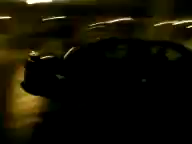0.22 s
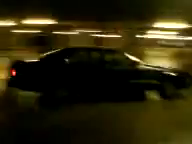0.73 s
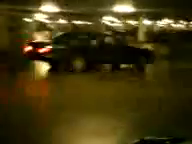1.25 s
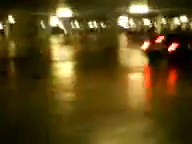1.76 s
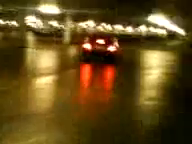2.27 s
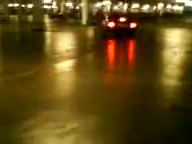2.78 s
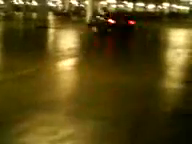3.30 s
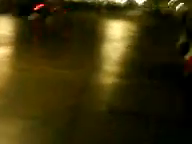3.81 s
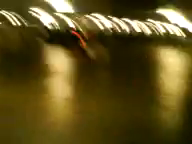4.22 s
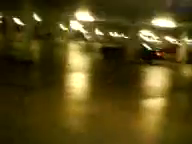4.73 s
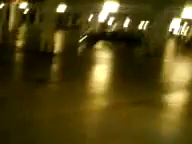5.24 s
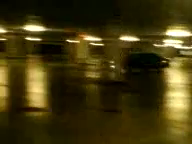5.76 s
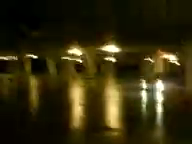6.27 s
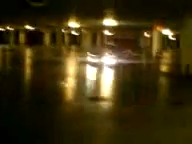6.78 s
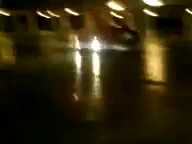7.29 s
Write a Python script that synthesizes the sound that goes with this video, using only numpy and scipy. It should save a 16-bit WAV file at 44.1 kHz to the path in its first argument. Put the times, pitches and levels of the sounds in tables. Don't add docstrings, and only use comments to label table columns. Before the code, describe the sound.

Rough engine roar and piercing tyre chirps on slick concrete fade into the distance, then a rising engine and ragged squeals return, ending loud.

```python
import sys
import numpy as np
from scipy import signal
from scipy.fft import rfft, irfft, next_fast_len
from scipy.io import wavfile
from scipy.ndimage import uniform_filter1d

SR = 44100
rng = np.random.default_rng(int(sys.argv[2]) if len(sys.argv) > 2 else 0)


def ratio_of_db(decibels):
    return 10 ** (np.asarray(decibels, float) / 20)


def inscribe(sig):
    pcm = np.round(np.clip(np.atleast_2d(sig).T, -1, 1) * 32767)
    wavfile.write(sys.argv[1], SR, pcm.astype(np.int16))


N = 334719
T = np.arange(N) / SR

# t/s, firing rate f/Hz
ENGINE_SPEED = [
    [(0, 116), (.14, 120), (.4, 124.8), (.66, 124.4), (.74, 114), (.82, 110), (.9, 90.2), (1.04, 83.6)],
    [(1.06, 134), (1.13, 129.5), (1.24, 131), (1.45, 110), (1.75, 103.5)],
    [(1.8, 102.7), (2.1, 101.5), (2.35, 103.5), (2.72, 91.5), (3.05, 94.6), (3.65, 89.8), (4.0, 91.6),
     (4.2, 95)],
    [(4.22, 66.5), (4.36, 85), (4.45, 94.5), (4.7, 102.7), (4.9, 118), (5.28, 134.5), (5.72, 169),
     (6.3, 194.5), (6.5, 197.5)],
    [(6.55, 199), (7.0, 209), (7.3, 224), (7.45, 219.5), (7.59, 219)],
]
# speed jitter (0-1), level scatter/dB
ENGINE_UNREST = [
    (.016, 5.),
    (.015, 5.),
    (.004, 2.5),
    (.005, 3.),
    (.012, 6.),
]
# t/s, level/dB, throttle bite in dB per octave of order
ENGINE_LOAD = [(.15, -21, 2), (.5, -17, 1.5), (.7, -19.5, 4.5), (.93, -20, -6), (1.17, -32.5, -10),
               (1.3, -37.5, -12), (1.65, -61.5, 2.5), (1.95, -42.5, -11.5), (2.8, -41.5, -5),
               (3.3, -48, -2), (4.19, -42.5, -7), (4.32, -30.5, 9.5), (4.7, -30, -2.5), (5.25, -27.5, 4),
               (5.8, -26, -5), (6.45, -30, 3.5), (6.65, -45, 3.5), (7.3, -25.5, -9.5)]
# level/dB over the effort, for firing orders 1, 1.5, 2, 3 and 1.25
ENGINE_ORDERS = [
    (-7.5, -14.5, -6.5, -4.5, -22),
    (-4, -8.5, -11.5, -8.5, -7),
    (-1, 2.5, -4.5, -16.5, -2.5),
    (2.5, -8, -5, -16, -24.5),
    (-1.5, 0, -4, -12.5, -16.5),
]
# f/Hz, width/Hz, level/dB
EXHAUST_RINGS = [(97, 4, 3.5), (108.4, 1.8, 5), (123.5, 5.8, -12), (131.8, 9.9, 8.5), (147, 4, -6),
                 (166, 5.1, 3), (184, 11, -11.5), (204, 3, 1.5), (226, 3.7, -0.5), (278, 21, 9),
                 (336, 12, -5), (362, 12, 2.5), (404.4, 15, -8.5), (503, 16, 0)]
# t/s, main tread tone f/Hz, level/dB, level of the other tones relative to it/dB
SLIDE_SQUEAL = [(.45, 1320, -22.5, 1.5), (.6, 1309, -12.5, -10), (.8, 1347, -19.5, 0),
                (.95, 1330, -7, -15.5), (1.07, 1310, -11, -4), (1.2, 1265, -29, 0),
                (1.29, 1202, -21.5, -1.5), (1.4, 1353, -28, -5), (1.6, 1400, -60.5, 22)]
TURN_SQUEAL = [(1.63, 1436, -55, -1), (1.665, 1497, -41.5, -2.5), (1.706, 1440, -26.5, -1.5),
               (1.76, 1378, -31, 1.5), (1.94, 1277, -29.5, -12.5), (2.09, 1347, -41.5, -1.5),
               (2.24, 1337, -31, -3), (2.3, 1398, -48.5, -1), (2.42, 1618, -47, 2.5)]
BRAKE_SQUEAL = [(3.71, 2090, -61.5, 0), (3.74, 2033, -17.5, 0), (3.79, 2065, -26, 0), (3.81, 2066, -37, 0),
                (3.95, 2120, -34, 0), (4.08, 2090, -40, 0), (4.25, 2000, -60, 0)]
SPIN_SQUEAL = [(5.5, 1431, -50.5, 14), (5.9, 1428, -35.5, 2.5), (6.05, 1405, -24, 4.5),
               (6.28, 1390, -18.5, -0.5), (6.55, 1365, -14, 1), (6.85, 1441, -15.5, 2.5),
               (7.15, 1503, -5, -9), (7.4, 1500, -7, 2), (7.59, 1458, -15, -2.5)]
CREEP_SQUEAL = [(4.02, 3373, -49, -22), (4.25, 3350, -60, -29), (4.6, 3420, -48.5, -20),
                (4.95, 3350, -58, 1), (5.1, 3350, -51, 15), (5.3, 3350, -54, 1)]
# ratio to it, level/dB; the creep's sit below it
SLIDE_UPPER = [(1.938, 0.)]
TURN_UPPER = [(2.13, -2.5), (1.99, -17)]
CREEP_LOWER = [(0.412, 0.003), (0.482, 0.)]
# start f/Hz, drift in Hz per s, level/dB
SPIN_UPPER = [(1868, -80, -1), (2334, 110.5, -6)]
# t/s, peak level/dB, f/Hz, length/s
SLIDE_SLIPS = [(.2556, -5.5, 1232, 0.037), (.864, 5.5, 1322, 0.025), (.9267, 4.5, 1224, 0.024),
               (.9548, 5, 1343, 0.046), (1.0601, -1.5, 1225, 0.037), (1.2391, -6.5, 1210, 0.011),
               (1.283, 3.5, 2432, 0.014), (1.284, -5.5, 1254, 0.023), (1.3804, -5.5, 1447, 0.01),
               (1.632, -32, 1460, 0.038), (1.674, -14, 3140, 0.029), (1.699, -8.5, 3050, .02),
               (3.737, -19.5, 2040, .01), (3.7737, -10.5, 2090, 0.0077)]
SCUFF_SLIPS = [(2.69, -37, 3210, 0.039), (2.708, -24.5, 3180, .04), (2.7206, -6.5, 2920, 0.0059),
               (2.7336, -14.5, 2410, 0.035), (2.768, -11.5, 1916, 0.021), (2.79, -44.5, 3380, 0.033),
               (4.292, -25.5, 2500, 0.01), (4.366, -30.5, 2110, 0.051)]
SPIN_SLIPS = [(5.033, -25, 1643, 0.029), (5.5777, -15, 1814, 0.028), (5.7094, -7, 2560, 0.009),
              (5.78, -12, 1914, 0.018), (5.8058, -1.5, 1852, .029), (5.888, -4, 2296, .02),
              (5.889, -12.5, 1363, .02), (5.9569, -6, 1854, 0.031), (5.979, -0.5, 1810, .025),
              (5.99, -3, 1613, 0.018), (6.0318, -6, 1814, 0.0098), (6.052, 1.5, 2115, .013),
              (6.0911, -6.5, 1950, 0.015), (6.1154, -1, 1877, 0.026), (6.1636, -5.5, 1420, 0.032),
              (6.211, -21, 1384, .011), (6.251, -8, 1880, 0.013)]
# t/s, peak level/dB
GRIT_SNAPS = [(2.314, -31), (2.723, -15), (2.731, -7), (2.773, -11.5), (2.783, -7.5), (2.789, -14),
              (3.465, -35), (3.651, -29), (3.817, -4), (4.093, -25), (4.203, -29)]
# low f/Hz, high f/Hz, flicker/dB
ROAR_EDGES = [
    (75, 420, 1.),
    (420, 1100, 1.5),
    (1180, 2100, 1.8),
    (2100, 3700, 2.8),
]
# engine level/dB, its steepness, tyre level/dB, its steepness, jolt level/dB
ROAR_SOURCES = [
    (-2.5, 1.35, -12, 0.8, 8.5),
    (-2, 2, -10.5, 0.82, 0),
    (-8, 2.3, 0, 1., -24),
    (-5, 2.18, -2.5, 1, -2),
]
# t/s, level/dB
TYRE_SCRUB = [(0, -16), (.6, -17.5), (.8, -20), (1.06, -25.5), (1.46, -47), (1.61, -46.5), (1.9, -42),
              (2.2, -48.5), (2.45, -56.5), (3.4, -56), (4.45, -60), (4.9, -43.5), (5.85, -31.5),
              (6.15, -22), (6.7, -13.5), (7.1, -13), (7.3, -9), (7.59, -20.5)]
# t/s, half length/s, level/dB
CAR_JOLTS = [(2.763, 0.055, -43.5), (3.64, 0.072, -54), (3.821, 0.0064, -41), (4.28, 0.043, -43)]
# f/Hz, width/Hz, level/dB
TREAD_RINGS = [(1365, 55, -1.5), (2324, 273, 6.5), (3350, 140, -2.5)]
# f/Hz, level/dB
PHONE_BAND = [(30, -13), (70, -1.5), (110, 0.5), (3000, -3), (3400, -4.5), (3700, -14), (4000, -17),
              (4300, -27.5), (4600, -90)]


def walk(rate):
    k = int(SR / rate)
    steps = np.repeat(rng.standard_normal(N // 50), k)[:N]
    return 1.3 * uniform_filter1d(uniform_filter1d(steps, k), k)


def held(rate):
    steps = np.cumsum(rate / SR * ratio_of_db(4 * walk(rate / 2))) + rng.random()
    values = rng.standard_normal(N // 50)
    return values[np.minimum(steps.astype(int), N // 50 - 1)], steps % 1


def play(table):
    s, *columns = np.transpose(table)
    gate = np.clip(np.minimum(T - s[0] + .01, s[-1] + .01 - T) / .02, 0, 1)
    return gate, [np.interp(T, s, c) for c in columns]


def tone(hz):
    return 2 * np.pi * (np.cumsum(hz) / SR + rng.random())


def band(low_hz, high_hz):
    sos = signal.butter(2, [low_hz, high_hz], "band", fs=SR, output="sos")
    x = signal.sosfilt(sos, rng.standard_normal(N))
    return x / x.std()


def engine():
    _, (hz,) = play(np.concatenate(ENGINE_SPEED))
    _, (load_db, bite_db) = play(ENGINE_LOAD)
    stage = np.searchsorted([table[0][0] for table in ENGINE_SPEED[1:]], T)
    first_db, half_db, second_db, third_db, quarter_db = np.transpose(ENGINE_ORDERS)[:, stage]
    jitter, scatter_db = np.transpose(ENGINE_UNREST)[:, stage]
    pipe_hz = np.arange(1200)
    ring_db = sum(db / (1 + ((pipe_hz - f) / w) ** 2) for f, w, db in EXHAUST_RINGS)
    phase = tone(hz * (1 + jitter * walk(30)))
    whole = {4: first_db, 8: second_db, 12: third_db, 16: third_db - 12, 20: third_db - 24}
    out = np.zeros(N)
    for quarter in range(2, 21):
        order = quarter / 4
        if quarter in whole:
            order_db = whole[quarter]
        else:
            octaves = np.log2(quarter / (6 - quarter % 2))
            fall_db = -11 * octaves ** 1.2 if octaves > 0 else 8.5 * octaves
            order_db = fall_db + (quarter_db if quarter % 2 else half_db)
        if quarter == 2:
            order_db = order_db + 12 * np.exp(-((hz / 2 - 87) / 6) ** 2)
        pipe_db = np.interp(hz * order, pipe_hz, ring_db)
        throttle_db = np.log2(max(order, 1)) * bite_db
        unrest_db = scatter_db * walk(32) + 2 * walk(9)
        db = load_db + throttle_db + pipe_db + order_db + unrest_db
        out += np.sqrt(2) * ratio_of_db(db) * np.sin(order * phase + quarter ** 2)
    return out, np.cos(phase)


def tread_tones(table, ratios=(), drifts=()):
    gate, (hz, db, upper_db) = play(table)
    tones = [(hz, db)]
    for ratio, tone_db in ratios:
        tones.append((ratio * hz, db + upper_db + tone_db))
    for start_hz, drift, tone_db in drifts:
        tones.append((start_hz + drift * (T - table[0][0]), db + upper_db + tone_db))
    return gate, tones


def squeal(gate, tones, count, scatter, patchy_db, slip_rate, rasp, trim_db):
    out = np.zeros(N)
    for _ in range(count):
        for hz, db in tones:
            hop, gone = held(slip_rate)
            catch = np.sin(np.pi * gone ** .6) ** .5
            grip = catch * ratio_of_db(db + patchy_db * walk(slip_rate / 2) + 2.84 * walk(300))
            loose = np.sqrt(hz / 1500)
            out += grip * np.sin(tone(hz * (1 + loose * scatter * hop + rasp * walk(400))))
    return gate * out * ratio_of_db(trim_db) / np.sqrt(count)


def squeals():
    out = squeal(*tread_tones(SLIDE_SQUEAL, SLIDE_UPPER), count=2, scatter=.025, patchy_db=1.0,
                 slip_rate=38, rasp=.02545, trim_db=3.5)
    out += squeal(*tread_tones(TURN_SQUEAL, TURN_UPPER), count=2, scatter=.014, patchy_db=6.0,
                  slip_rate=24, rasp=.012, trim_db=9.5)
    out += squeal(*tread_tones(BRAKE_SQUEAL), count=2, scatter=.0046, patchy_db=5.5,
                  slip_rate=25, rasp=.0121, trim_db=2.5)
    out += squeal(*tread_tones(SPIN_SQUEAL, drifts=SPIN_UPPER), count=2, scatter=.045, patchy_db=6.0,
                  slip_rate=40, rasp=.033, trim_db=2.0)
    out += squeal(*tread_tones(CREEP_SQUEAL, CREEP_LOWER), count=1, scatter=.012, patchy_db=6.5,
                  slip_rate=22, rasp=.018, trim_db=3.5)
    return out


def chirps():
    out, waver = np.zeros(N), walk(350)
    scuff = band(1500, 3400) * ratio_of_db(9 * walk(250))
    age = np.arange(int(.12 * SR)) / SR
    for slips, rough in [(SLIDE_SLIPS, .09), (SCUFF_SLIPS, .7), (SPIN_SLIPS, .25)]:
        for s, db, hz, length in slips:
            i = int(s * SR) + np.arange(len(age))
            shape = (1 - np.exp(-age / .0018)) * np.exp(-(age / length) ** 2)
            ring = np.sin(2 * np.pi * np.cumsum(hz * (1 + .099 * rough * waver[i])) / SR)
            out[i] += ratio_of_db(db - 3.5) * shape * (ring + .26 * rough * scuff[i])
    return out


def ticks():
    out, age = np.zeros(N), np.arange(400) / SR
    crack = np.exp(-age / .00064) * np.cos(2 * np.pi * 2300 * age)
    for s, db in GRIT_SNAPS:
        start = int(s * SR)
        out[start:start + len(age)] += ratio_of_db(db + 1) * crack
    return out


def flecks(low_hz, high_hz, rate, spread_db):
    hop, gone = held(rate)
    hz = np.sqrt(low_hz * high_hz) * (high_hz / low_hz) ** np.clip(hop / 5, -.35, .5)
    level = np.sin(np.pi * gone) * ratio_of_db(spread_db * walk(rate))
    return level * np.sin(tone(hz * (1 + .02 * walk(400))))


def roar_levels():
    near_db = -18
    load_db = play(ENGINE_LOAD)[1][0] - near_db
    slip_db = play(TYRE_SCRUB)[1][0] - near_db
    jolt = sum(ratio_of_db(2 * db) * np.exp(-((T - s) / half) ** 2) for s, half, db in CAR_JOLTS)
    levels = []
    for engine_db, steep, tyre_db, sharp, jolt_db in ROAR_SOURCES:
        power = ratio_of_db(2 * (near_db + engine_db + steep * load_db))
        power = power + ratio_of_db(2 * (near_db + tyre_db + sharp * slip_db))
        power = power + ratio_of_db(2 * jolt_db) * jolt
        levels.append(10 * np.log10(power))
    return levels


def roar(cycle):
    shared = 1.1 * walk(9)
    hz = np.arange(N // 2 + 1) * SR / N
    ring = ratio_of_db(sum(db / (1 + ((hz - f) / w) ** 2) for f, w, db in TREAD_RINGS))
    out = np.zeros(N)
    for db, (low_hz, high_hz, flicker_db) in zip(roar_levels(), ROAR_EDGES):
        noise = np.fft.irfft(np.fft.rfft(band(low_hz, high_hz)) * ring, N)
        noise = noise * (1 + .35 * cycle)
        if low_hz > 900:
            squeaks = flecks(low_hz, high_hz, 45, spread_db=6.5) + flecks(low_hz, high_hz, 30, spread_db=-2.5)
            noise += ratio_of_db(-3) * squeaks
        out += ratio_of_db(db - 2 + shared + flicker_db * walk(35)) * noise
    return out


def garage(x, wet_db):
    t60_s = 1.0
    age = np.arange(int(1.5 * SR)) / SR
    tail = rng.standard_normal(len(age)) * np.exp(-np.log(1000) * age / t60_s) * (age > .012)
    return x + ratio_of_db(wet_db) * signal.fftconvolve(x, tail / np.sqrt(np.sum(tail ** 2)))[:N]


def hush():
    return ratio_of_db(-59.5) * band(100, 3500)


def scene():
    orders, cycle = engine()
    tyres = squeals() + chirps() + ticks()
    mix = garage(orders, wet_db=-8) + garage(tyres, wet_db=-20) + roar(cycle) + hush()
    return mix[None]


def roll_off(x):
    return signal.sosfilt(signal.butter(12, 15900, fs=SR, output="sos"), x)


def record(dry):
    limit_db, limit_share, clip = -9.7, .6, .73
    size = next_fast_len(N)
    hz = np.maximum(np.arange(size // 2 + 1) * SR / size, 1)
    band_hz, band_db = np.transpose(PHONE_BAND)
    colour = ratio_of_db(np.interp(np.log(hz), np.log(band_hz), band_db))
    narrow = irfft(rfft(dry, size) * colour, size)[:, :N]
    bass = irfft(rfft(narrow, size) / (1 + (hz / 600) ** 4), size)[:, :N]
    treble_db = 10 * np.log10(uniform_filter1d((narrow - bass) ** 2, size=900) + 1e-12)
    jump_db = np.maximum(treble_db - uniform_filter1d(treble_db, size=16000) - 8, 0)
    ducked = narrow - bass * (1 - ratio_of_db(-.7 * jump_db))
    loudness_db = 10 * np.log10(uniform_filter1d(ducked ** 2, size=1500) + 1e-12)
    over_db = np.maximum(loudness_db - limit_db, 0)
    mix = np.clip(ducked * ratio_of_db(-limit_share * over_db), -clip, clip)
    return roll_off(mix)


dry = scene()
out = record(dry)
inscribe(out)
```